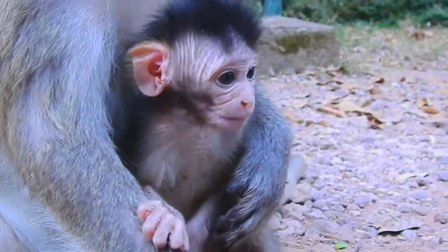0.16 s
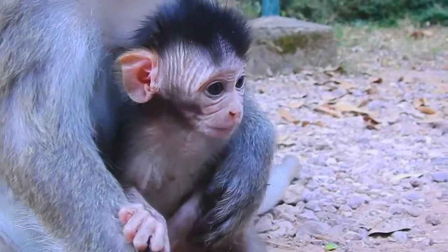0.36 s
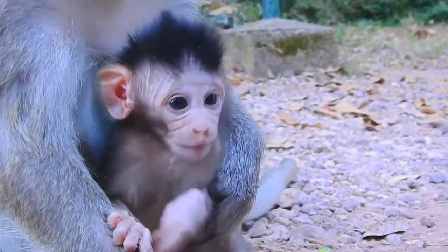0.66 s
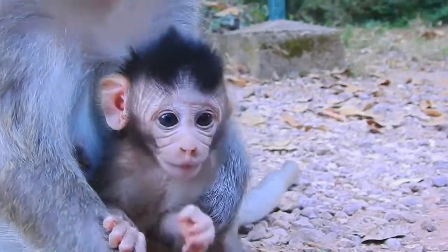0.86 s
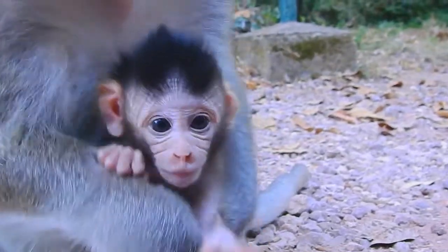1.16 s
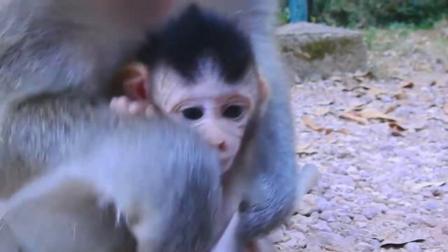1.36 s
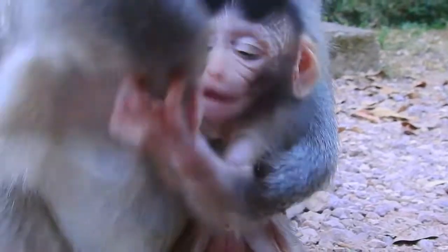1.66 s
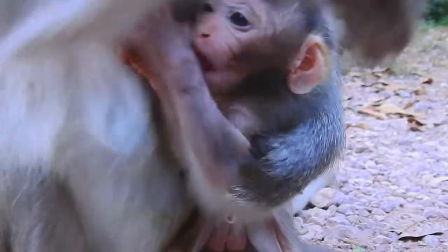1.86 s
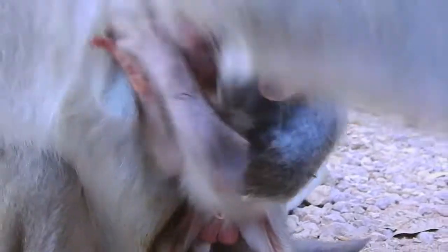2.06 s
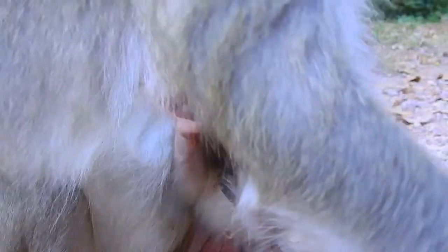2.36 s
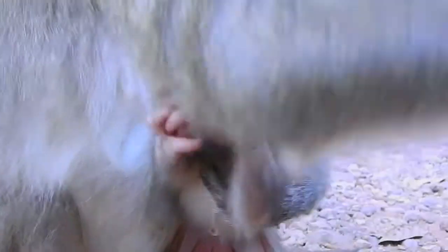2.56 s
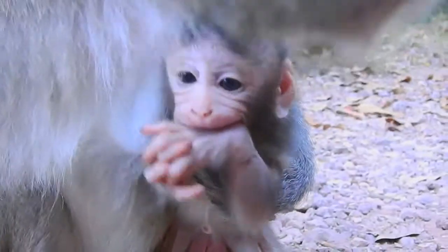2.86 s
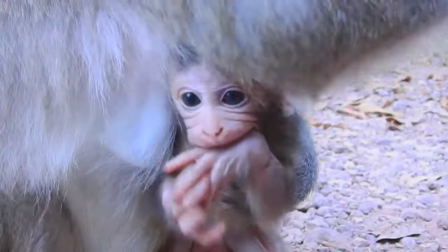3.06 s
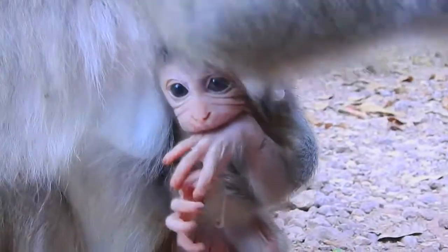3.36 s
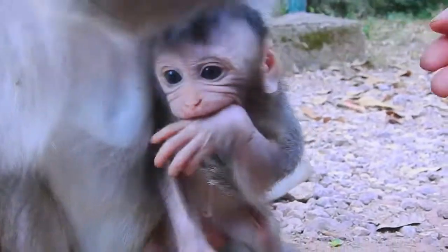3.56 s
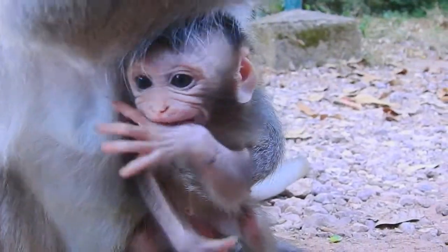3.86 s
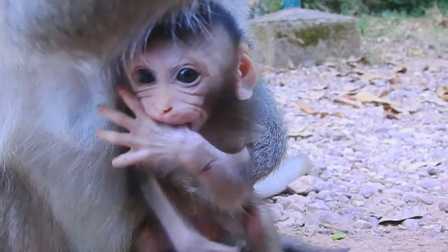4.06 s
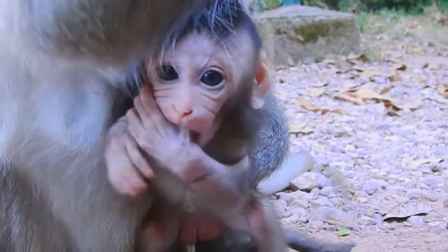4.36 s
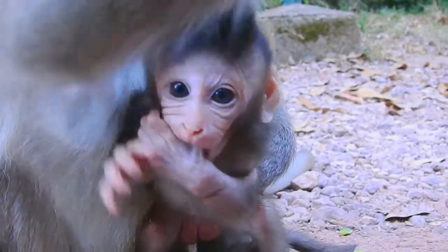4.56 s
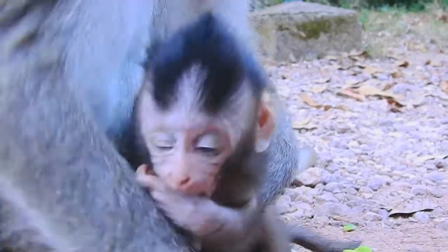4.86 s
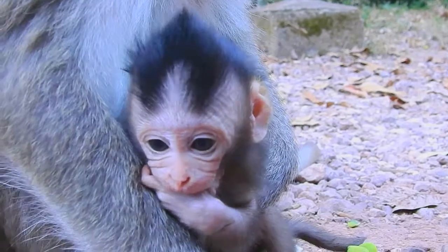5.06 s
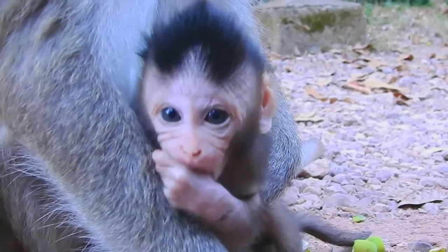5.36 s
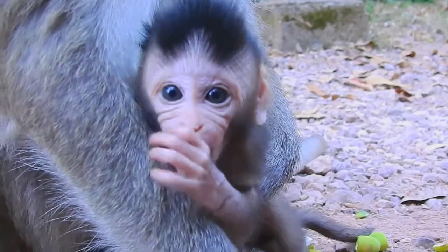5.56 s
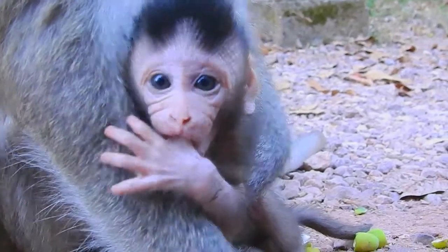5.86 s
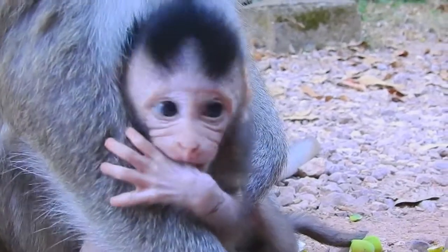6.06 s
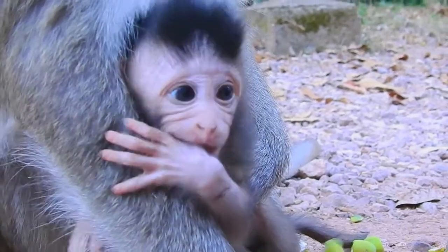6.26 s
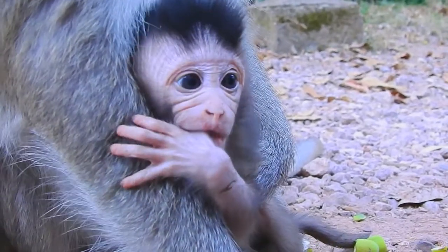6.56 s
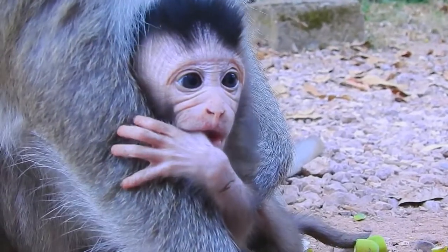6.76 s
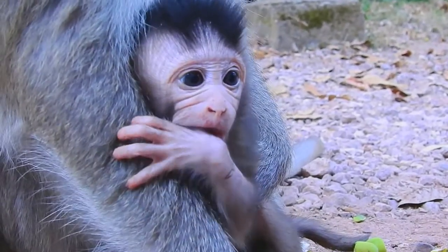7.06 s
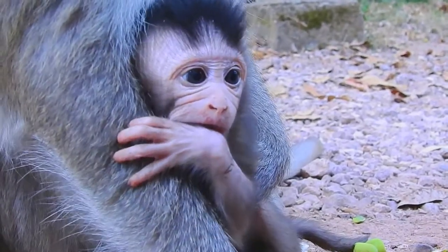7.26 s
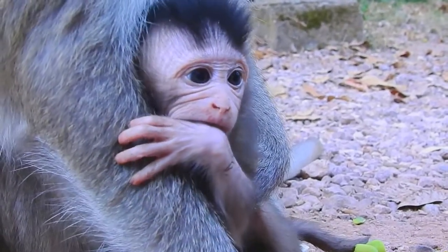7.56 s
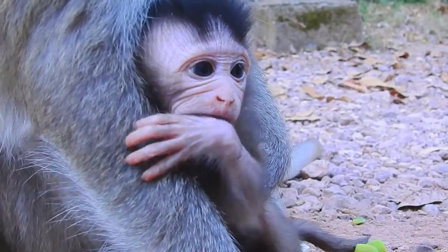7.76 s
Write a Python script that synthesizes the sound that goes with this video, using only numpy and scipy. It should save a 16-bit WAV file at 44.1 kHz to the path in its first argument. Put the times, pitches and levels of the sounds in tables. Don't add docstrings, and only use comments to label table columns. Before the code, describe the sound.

Outdoors beside a road, a low traffic rumble swells gently beneath thin, faintly throbbing cicadas near 2.3 and 4.6 kHz. At 0 s a single-cylinder motorbike is abreast, deep thuds about 27 per second, falling in pitch and fading behind a wall soon after 1.2 s. A heavy gravel step at 0.25 s, light grit and small finger touches on the left follow until 0.55 s. From about 1.6 s a slow bike throbs distantly, strongest around 2.4 to 2.8 s, sinking and swelling again. A faster bike grows from about 4 s, passes at 6.4 s with tyre roar, pulsing engine noise and a loose panel rattling brightest near 6.2 s, then drops in pitch and recedes. A light finger touch comes at 5.86 s; gravel scrapes end 7.75 to 7.9 s. The right is open with faint bright hiss; the left is muffled, bass-poor, with dull hiss.

```python
import sys
import numpy as np
from scipy import signal
from scipy.fft import rfft, irfft, next_fast_len
from scipy.io import wavfile
from scipy.ndimage import uniform_filter1d, map_coordinates

SR = 44100
rng = np.random.default_rng(int(sys.argv[2]) if len(sys.argv) > 2 else 0)


def bounce(signal):
    frames = np.transpose(np.atleast_2d(signal))
    limited = np.clip(frames, -1, 1)
    pcm = np.round(limited * 32767).astype(np.int16)
    wavfile.write(sys.argv[1], SR, pcm)


N = 348831

FIRST_PASS = dict(closest_s=0.0, speed=11, metres=3.5, hz=27, slowing=1.44)
SECOND_PASS = dict(closest_s=6.36, speed=15.4, metres=4.8, hz=30.6, slowing=.12)
EDGE_HZ = 11800


def undb(db):
    return 10 ** (np.asarray(db) / 20)


def level(x, db):
    return x * undb(db) / np.sqrt(np.mean(x ** 2))


def colour(x, points, mirror="even"):
    size, margin = next_fast_len(N + SR), SR // 2
    hz, db = np.transpose(points)
    bins = np.arange(size // 2 + 1) * SR / size + 1
    gain = undb(np.interp(np.log(bins), np.log(hz), db))
    wide = np.pad(x, margin, mode="reflect", reflect_type=mirror)
    wide = wide * signal.windows.tukey(N + 2 * margin, SR / N)
    return irfft(rfft(wide, size) * gain, size)[margin:margin + N]


def resonance(x, hz, width_hz):
    return signal.lfilter(*signal.iirpeak(hz, hz / width_hz, SR), x)


def walk(rate):
    hold = int(SR / rate)
    steps = np.repeat(rng.standard_normal(N // hold + 1), hold)
    return 1.33 * uniform_filter1d(uniform_filter1d(steps, hold), hold)[:N]


def patchy(points, patchy_db, rate, per_octave, lift=((0, 1000, 0), (9, 1000, 0))):
    hz, s, z = signal.stft(rng.standard_normal(N), SR, nperseg=1024)
    octave = np.log2(np.maximum(hz, 20) / 20)[:, None]
    where = np.broadcast_arrays(octave * per_octave, s * rate)
    field = map_coordinates(rng.standard_normal((200, 200)), where, order=3)
    at, centre_hz, lift_db = np.transpose(lift)
    centre = np.log2(np.interp(s, at, centre_hz) / 20)
    hump = np.exp(-((octave - centre) / 0.089) ** 2)
    z = z * undb(patchy_db * field + np.interp(s, at, lift_db) * hump)
    return colour(signal.istft(z, SR, nperseg=1024)[1][:N], points)


def drive(closest_s, speed, metres, hz, slowing, late_s=0.):
    t = np.arange(N) / SR - closest_s - late_s
    r = np.hypot(speed * t, metres)
    front = -speed * t / r
    heard_hz = (hz - slowing * t) * (1 + speed * front / 343)
    return heard_hz, 20 * np.log10(metres / r), front


def distant_traffic():
    # f/Hz, density/dB per Hz
    rumble = [(20, -46), (45, -9.5), (70, -2), (150, 6), (200, -11.5), (300, -17.5), (600, -34),
              (1100, -40), (2000, -50), (4000, -67)]
    return undb(1.1 * walk(.8)) * level(patchy(rumble, 1.8, 3.155, 5.1), -30.5)


def cicadas():
    # f/Hz, width/Hz, level/dB
    bands = [
        (2298, 48, -70.5),
        (4622, 72, -69.5),
    ]
    beat = 2 * np.pi * np.cumsum(6.0 + 1.05 * walk(1.7)) / SR
    throb = .7 + .3 * np.clip(1.6 + 2 * np.sin(beat), 0, 1)
    song = 0
    for hz, width, db in bands:
        band = resonance(resonance(rng.standard_normal(N), hz, width), hz, width)
        song = song + level(band, db)
    return throb * undb(0.71 * walk(0.39)) * song


def taps():
    # t/s, peak level/dB
    fingers = [
        (.391, -41),
        (.406, -45),
        (.42, -47),
        (.551, -41),
        (5.859, -43),
    ]
    # t/s, peak level/dB, f/Hz, t60/s
    scuffs = [
        (.247, -27.5, 140, .056),
        (.285, -45, 1400, .034),
        (.38, -46.5, 1586, 0.03),
        (0.555, -40, 1520, 0.02),
        (7.753, -37.5, 1560, 0.14),
        (7.757, -39, 1920, .03),
        (7.768, -41.5, 4000, 0.042),
        (7.805, -50, 5700, 0.015),
        (7.86, -44, 1640, 0.031),
        (7.874, -45, 4200, 0.039),
    ]
    rows = [(s, db, 446, 0.035, 20) for s, db in fingers]
    rows = rows + [(s, db, hz, t60, -19 + 6.5 * np.log2(hz / 1600)) for s, db, hz, t60 in scuffs]
    out, t = np.zeros((2, N + SR)), np.arange(4000) / SR
    for s, db, hz, t60, pan_db in rows:
        decay = np.exp(-np.log(1000) * t / t60)
        knock = rng.standard_normal(len(t)) * decay * np.minimum(t * hz / 2, 1)
        for _ in range(3):
            knock = resonance(knock, hz, .7 * hz)
        i = int(s * SR)
        port_db = db - np.clip([[-pan_db], [pan_db]], 0, None)
        out[:, i:i + len(t)] += undb(port_db) * knock / np.abs(knock).max()
    return out[:, :N]


def road_levels():
    loss_db = drive(**SECOND_PASS, late_s=-0.11)[1]
    first = undb(-50.5 + drive(**FIRST_PASS)[1])
    second = undb(-34.5 + 0.9 * loss_db)
    return undb(loss_db), np.hypot(first, second)


def tyres(near, both):
    # f/Hz, density/dB per Hz
    roar_colour = [(110, -41), (180, -1.5), (338, -9.5), (408, -6), (459, -10), (499, -8.5), (595, -12),
                   (742, -20.5), (850, -27), (1100, -44), (1870, -120)]
    front = drive(**SECOND_PASS, late_s=0.059)[2]
    body_hz = 670 - 56.5 * front - 210 * near ** 4
    body = np.transpose([np.arange(N) / SR, body_hz, 7.5 * near ** 0.34])
    return level(patchy(roar_colour, 2.5, 5, 10, body), 0) * both


def engine(near, both, cycle):
    # f/Hz, density/dB per Hz
    engine_colour = [(410, -9), (700, -4.5), (746, -2), (1160, -5), (1720, -14), (1970, -15), (2170, -19.5),
                     (3300, -23), (3670, -15.5), (5110, -26), (9000, -49), (11700, -63), (19800, -120)]
    _, loss_db, front = drive(**SECOND_PASS, late_s=0.059)
    echo_hz = 1214 + 288 * front
    echo_db = undb(loss_db) * front ** 4 * (34 - 3.5 * front)
    echo = np.transpose([np.arange(N) / SR, echo_hz, echo_db])
    bright = level((1 + .4 * cycle) * patchy(engine_colour, 2.5, 5, 18, echo), 0) * both
    return bright * undb(-11.5 + 5.5 * near ** 4)


def loose_panel(phase, cycle):
    # multiple of firing rate, half width/Hz, level/dB
    rattle = [
        (120, 60, 0),
        (114, 70, -1),
        (136, 90, -16),
    ]
    rings = 0
    for multiple, width, db in rattle:
        hum = colour(rng.standard_normal(N), [(width, 0), (3 * width, -20), (20 * width, -90)])
        rings = rings + undb(db) * level(hum, 0) * np.cos(multiple * phase)
    panel = (.35 + cycle ** 2) * undb(1.5 * walk(30)) * rings
    beam_db = 10.5 * np.exp(-((np.arange(N) / SR - 6.19) / .1) ** 4)
    rattle_db = -62.5 + 1.9 * drive(**SECOND_PASS, late_s=-0.33)[1] + beam_db
    return level(panel, 0) * undb(rattle_db)


def road(phase):
    near, both = road_levels()
    cycle = .5 + .5 * np.cos(phase)
    return tyres(near, both) + engine(near, both, cycle) + loose_panel(phase, cycle)


def order_db(loss_db, front, near_db, fall, front_db):
    return near_db + fall * loss_db + front_db * front


def exhaust(hz, low_db, fifth_db, orders_db, low, smear, wander_db, drift, scatter_db, hollow_db=0):
    phase = 2 * np.pi * np.cumsum(hz) / SR
    out = 0
    for k, db in enumerate(orders_db, 1):
        slope_db = low_db + (fifth_db - low_db) * np.clip((k - low) / (5 - low), 0, 1)
        slope_db = slope_db - hollow_db * (low < k < 5)
        late = smear * k * (k - 1)
        gain = undb(db + slope_db + wander_db * (walk(4) + 0.35 * walk(14)))
        out = out + gain * np.cos(k * phase - late + drift * (walk(3.05) + 0.25 * walk(14)))
    return np.sqrt(2) * out * undb(scatter_db * walk(28)), phase


def slow_bike():
    # t/s, firing rate f/Hz, level/dB
    course = [
        (1.1, 24, -75),
        (1.6, 24.05, -49),
        (2.4, 23.99, -40.5),
        (2.8, 24.13, -40.5),
        (3.2, 23.87, -49.5),
        (3.7, 24.04, -45.5),
        (4.8, 24.32, -44.5),
        (6, 25.42, -47.5),
        (7.9, 25.3, -54),
    ]
    # level/dB of order 1, 2, 3 ..
    slow_orders = [-29, -6, -0.5, 6.5, 2, 4.5, -3, -12, -36.5, -19, -26, -18.5]
    s, *columns = np.transpose(course)
    hz, db = [np.interp(np.arange(N) / SR, s, column) for column in columns]
    return exhaust(hz, db, db + 1, slow_orders, 3, .15, 1.3, .35, 1.3)[0]


def first_bike():
    # level/dB of order 1, 2, 3 ..
    leaving_orders = [-28, -12, 0, -1, 0, -7, -20, -28, -32, -34, -34, -36]
    hz, *way = drive(**FIRST_PASS)
    low_db = order_db(*way, -28.5, .25, 0.33)
    fifth_db = order_db(*way, -33, 0.11, -.3)
    hidden_s = np.maximum(np.arange(N) / SR - 1.243, 0)
    wall = undb(-30 * np.sqrt(hidden_s))
    return wall * exhaust(hz, low_db, fifth_db, leaving_orders, 3, .15, 1.5, .35, 1.8)[0]


def second_bike():
    # level/dB of order 1, 2, 3 ..
    passing_orders = [-20, 0, -6.5, -1, 0, -15, -18, -27, -27, -31, -31, -33]
    hz = drive(**SECOND_PASS)[0]
    way = drive(**SECOND_PASS, late_s=.08)[1:]
    low_db = order_db(*way, -25.5, 1, 0.54)
    fifth_db = order_db(*way, -23.5, 1.18, 1)
    hollow_db = 3.5 * way[1]
    return exhaust(hz, low_db, fifth_db, passing_orders, 2, np.pi / 2, 1.1, .3, 1.3, hollow_db)


def left_port(air):
    # f/Hz, level/dB
    muffle = [(40, -38), (200, -40), (600, -36), (1100, -22), (1900, -14), (2300, -8), (3700, -9),
              (4600, -18), (8000, -8)]
    # f/Hz, density/dB per Hz
    dull_hiss = [(20, -20), (60, -2.5), (100, 2.5), (160, -2.5), (230, -8.5), (500, -14.5), (1000, -18.5),
                 (2000, -20.5), (4500, -20.5), (7000, -24.5), (10000, -30), (11600, -33.5), (12400, -35.5)]
    return colour(air, muffle, "odd") + level(patchy(dull_hiss, 1.4, 13.0, 4.1), -53.5)


def right_port(air):
    # f/Hz, density/dB per Hz
    bright_hiss = [(300, -21.5), (1000, -5.5), (2000, 4), (4500, 3), (7000, -3), (10000, -8),
                   (11600, -11.5), (12400, -17)]
    return air + level(patchy(bright_hiss, 0.27, 9.6, 2.9), -59)


def scene():
    second, phase = second_bike()
    near_sounds = first_bike() + slow_bike() + second + road(phase) + cicadas()
    air = undb(5.0) * near_sounds + distant_traffic()
    return np.array([left_port(air), right_port(air)]) + taps()


def strays():
    out, t = np.zeros((2, N + SR)), np.arange(2048) / SR
    for at, high, side, size in rng.random((int(42 * N / SR), 4)):
        hz = EDGE_HZ - 800 * np.log(high)
        i = int(at * N)
        tone = np.hanning(len(t)) * np.sin(2 * np.pi * hz * t)
        out[int(2 * side), i:i + len(t)] += undb(-83.5 + 5 * size) * tone
    return out[:, :N]


def roll_off(x):
    return signal.sosfilt(signal.butter(12, 15000, fs=SR, output="sos"), x)


def record(dry):
    opening = np.minimum(np.arange(N) / SR / .002, 1)
    treble_cut = signal.ellip(8, .2, 60, EDGE_HZ, fs=SR, output="sos")
    mix = signal.sosfilt(treble_cut, dry * opening) + strays()
    return roll_off(mix)


dry = scene()
out = record(dry)
bounce(out)
```